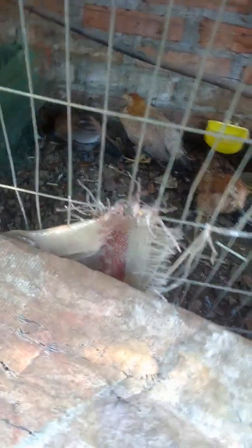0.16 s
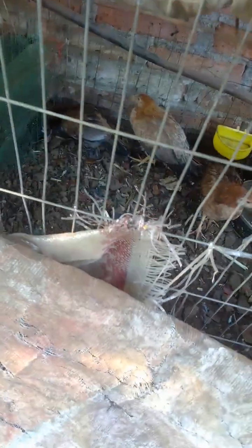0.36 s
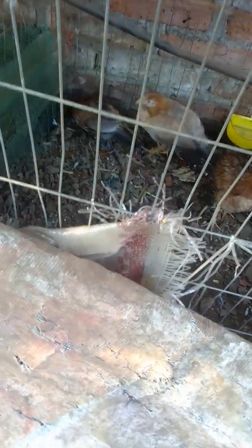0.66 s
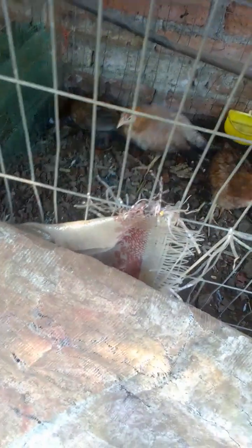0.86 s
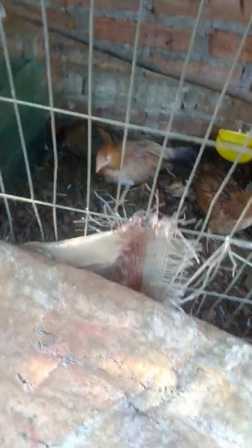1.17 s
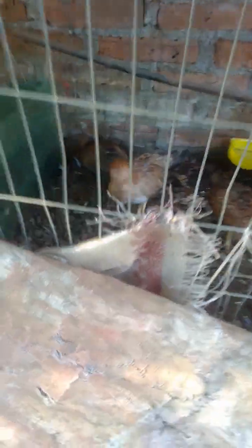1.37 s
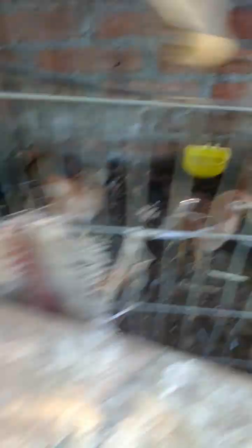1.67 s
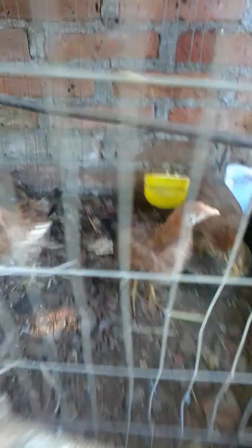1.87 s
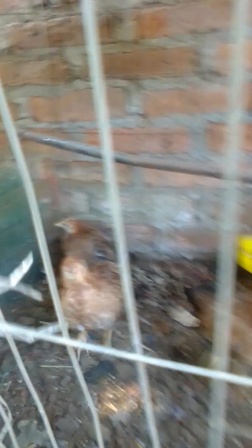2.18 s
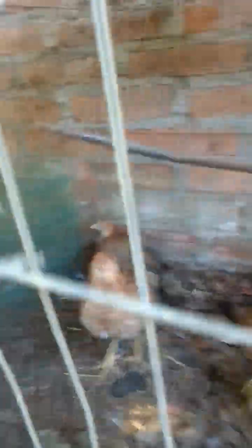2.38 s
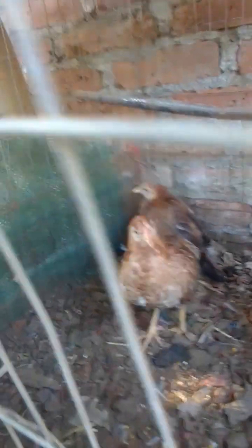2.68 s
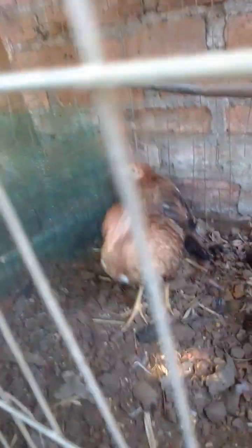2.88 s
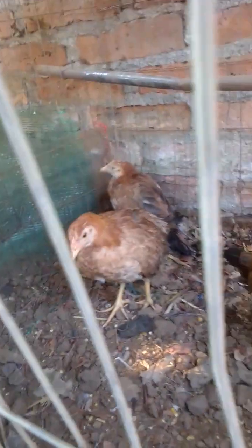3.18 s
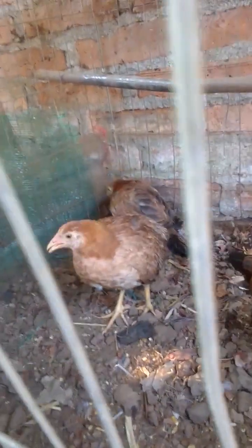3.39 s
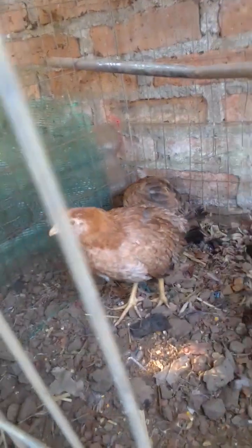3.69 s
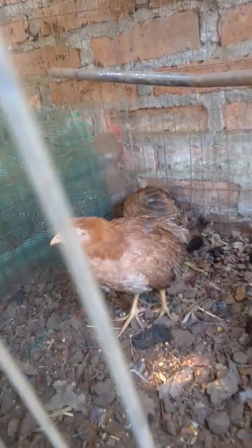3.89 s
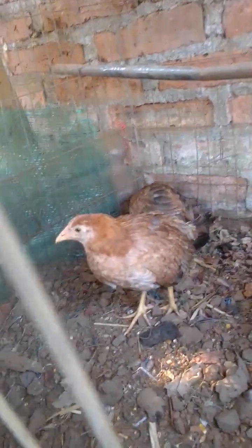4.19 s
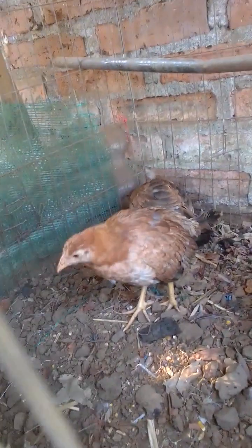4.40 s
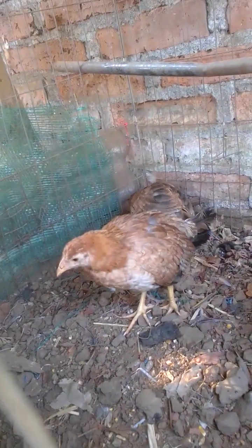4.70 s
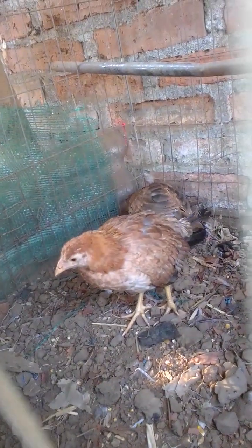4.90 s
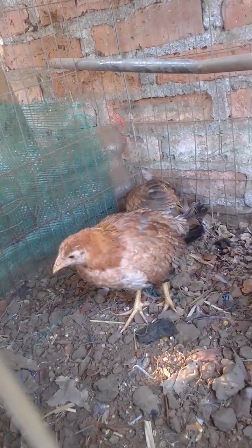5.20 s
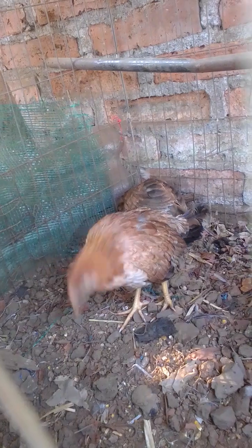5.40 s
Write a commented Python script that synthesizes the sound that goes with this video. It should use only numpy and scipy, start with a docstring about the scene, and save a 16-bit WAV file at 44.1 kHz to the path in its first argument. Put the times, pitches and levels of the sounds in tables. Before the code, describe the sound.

Chickens rake the dirt, beat their wings against wire mesh, then one draws out a hoarse call in a quiet yard.

```python
"""Young hens in a wire pen against a brick wall: wings beat and brush the mesh, feet rake the litter.
Rustle, scrape and thud are clumps of tiny contacts; snaps and knocks are noise puffs through a resonance.
Hens squawk and croon, and one draws out a long hoarse call of wavering partials and narrow noise bands.
Chicks peep in near-sines; wild birds whistle and chirp further off. The wall returns a short echo,
and yard hum and stirring air lie underneath."""
import sys
import numpy as np
from scipy import signal
from scipy.fft import rfft, irfft, next_fast_len
from scipy.io import wavfile

SR = 44100
rng = np.random.default_rng(int(sys.argv[2]) if len(sys.argv) > 2 else 0)


def wrap_up_sound(samples):
    """Save the sound to the file named by the first command line argument, as 16-bit audio."""
    columns = np.atleast_2d(samples).T
    # keep every value between -1 and 1, then stretch to whole-number steps
    tamed = np.clip(columns, -1, 1)
    steps = np.round(tamed * 32767).astype(np.int16)
    wavfile.write(sys.argv[1], SR, steps)


N = 244306

# The flock's steady stirring. Each row: time in seconds, then rustle, wire, thud and dryness in dB.
FIDGET = [(0, -70.5, -71, -72.5, 5), (.12, -62.5, -68.5, -61, -9), (.59, -68.5, -61, -60, -10),
          (.8, -65.5, -65, -50, 3), (.92, -72, -76.5, -66, -3), (1.0, -73, -62, -72.5, 21),
          (1.33, -68.5, -74, -62, -16), (1.5, -68, -82, -75, -5), (1.72, -94, -90, -87, 0),
          (1.78, -69.5, -75, -76, -8), (1.9, -58.5, -72, -54, -31), (2.05, -60, -75, -69.5, -9),
          (2.4, -50.5, -60, -53, -3), (2.57, -46.5, -64, -65, -9), (2.72, -35, -55, -56.5, -2),
          (2.87, -55, -45.5, -51, -6), (2.96, -44, -54.5, -63, -4), (3.13, -71.5, -74.5, -78, -9),
          (3.33, -93.5, -100, -100, 8.5), (3.5, -77.5, -77, -86.5, -4.5), (3.82, -63, -72, -64.5, 23),
          (4.0, -74, -73.5, -68.5, 19), (4.26, -86, -92.5, -84.5, 7), (4.4, -66, -76, -67.5, -1),
          (4.6, -73, -77.5, -80, -1.5), (4.95, -83.5, -81, -73.5, 4.5), (5.45, -86.5, -76, -76.5, -2),
          (5.54, -65.5, -67.5, -63.5, 2)]
# Wing strokes against air and mesh. Each row: end of build-up, build-up length and hold in seconds,
# then rustle, wire, thud and dryness in dB.
WINGBEATS = [(0.942, .012, 0.027, -60, -63, -67, 15), (1.137, .03, 0.021, -60.5, -62, -67, 0),
             (1.255, .05, 0.031, -62.5, -69, -58, 1), (1.416, .015, 0.013, -43.5, -79, -67, -3.5),
             (1.807, .025, 0.06, -45.5, -54.5, -55, -12.5), (2.106, .03, .004, -36.5, -53.5, -62, -7),
             (2.148, .04, 0.0061, -46, -74, -78, 1), (2.287, .075, 0.0066, -21.5, -34.5, -40.5, -15.5),
             (2.326, .02, 0.0044, -26.5, -38.5, -47.5, 1), (2.354, .015, 0.003, -38, -40, -63, 26),
             (2.398, .012, 0.0045, -37.5, -56, -47.5, -4), (2.456, .015, 0.0074, -27.5, -40, -48, 1.5),
             (2.483, .012, 0.011, -30.5, -53.5, -67, -6), (2.587, .01, 0.024, -55, -50, -47.5, -11),
             (2.606, .012, 0.014, -36.5, -55, -45.5, -8.5), (2.635, .014, 0.0043, -18, -38, -49.5, -6),
             (2.666, .04, 0.029, -30, -45.5, -73, -10), (2.77, .008, 0.0063, -28, -39.5, -45.5, 0),
             (2.801, .05, .022, -31, -39, -42, -3.5), (2.894, 0.04, 0.028, -26, -33.5, -46.5, -7),
             (2.972, .012, 0.0087, -46, -59, -59, 2)]
# Feet raking the litter. Each row: peak time in seconds, then thud, wire and hardness in dB.
RAKES = [(.12, -68, -79, -15), (0.249, -49, -56.5, -10), (0.307, -43, -53.5, -9), (0.356, -47, -57, -18),
         (0.402, -41.5, -68, 3), (0.491, -51.5, -63, 17), (0.536, -47.5, -62, -15), (.598, -41, -45, -18),
         (.628, -41, -55, -15), (0.649, -36.5, -43.5, -16), (0.697, -35, -54, -15), (.8, -63, -71, -19),
         (1.22, -44.5, -72, -24), (1.362, -56, -64, -29), (1.436, -50.5, -73, -22.5),
         (1.837, -38.5, -46, -24), (3.919, -56.5, -57, -23), (4.069, -69, -60, -23.5),
         (4.143, -47, -71, -16), (4.401, -53, -50, -24)]


def amp(db):
    return 10 ** (np.asarray(db) / 20)


def rms_one(x):
    return x / np.sqrt(np.mean(x ** 2) + 1e-20)


def in_time(rows):
    """Rows of (seconds, values..) to one per-sample curve per value."""
    s, *columns = np.transpose(rows)
    return [np.interp(np.arange(N) / SR, s, c) for c in columns]


def drift(rate_hz):
    """Low-passed noise, rms 1."""
    r = np.exp(-2 * np.pi * rate_hz / SR)
    return rms_one(signal.lfilter([1], [1, -2 * r, r * r], rng.standard_normal(N + SR))[SR:])


def coloured(x, spectrum):
    """Shapes a flat signal by (Hz, dB) points; rms 1."""
    size = next_fast_len(N)
    hz, db = np.transpose(spectrum)
    bins_hz = np.maximum(np.arange(size // 2 + 1) * SR / size, 1)
    shape_db = np.interp(np.log(bins_hz), np.log(hz), db, left=-90, right=-90)
    return rms_one(irfft(rfft(x, size) * amp(shape_db), size)[:N])


def resonance(x, hz, width_hz):
    """Two-pole band-pass, peak gain 1."""
    r = np.exp(-np.pi * width_hz / SR)
    feedback = [1, -2 * r * np.cos(2 * np.pi * hz / SR), r * r]
    return signal.lfilter([(1 - r * r) / 2, 0, (r * r - 1) / 2], feedback, x)


def butter(x, order, hz, kind):
    return signal.sosfilt(signal.butter(order, hz, kind, fs=SR, output="sos"), x)


def tilted(x, split_hz, tilt_db):
    """Raises the part above the split against the part below."""
    low, high = butter(x, 4, split_hz, "low"), butter(x, 4, split_hz, "high")
    return low * amp(-tilt_db / 2) + high * amp(tilt_db / 2)


def grains(per_s, spread_db, clump_db):
    """Tiny contacts at random moments, uneven in size, in clumps."""
    born = rng.random(N) < per_s / SR
    sizes = amp(spread_db * np.minimum(rng.exponential(1, N), 4)) * rng.choice([-1, 1], N)
    return born * sizes * amp(clump_db * drift(33))


def tone(track, ratio=1, rough_db=0, rough_hz=0, jitter=0, phase_rad=0):
    """One partial along a (seconds, Hz, dB) track; with jitter, pitch and level waver."""
    hz, db = in_time(track)
    t = np.arange(N) / SR
    gate = np.clip(np.minimum(t - track[0][0], track[-1][0] - t) / 0.01, 0, 1)
    if jitter:
        hz = hz * (1 + jitter * drift(rough_hz))
        db = db + rough_db * drift(rough_hz)
    return np.sqrt(2) * gate * amp(db) * np.sin(2 * np.pi * np.cumsum(ratio * hz) / SR + phase_rad)


def noise_band(track, spread_hz, ratio=1):
    """Narrow noise riding on a pitch track."""
    quadrature = [tone(track, ratio, phase_rad=phase) for phase in (0, np.pi / 2)]
    return sum(part * drift(spread_hz) for part in quadrature) / np.sqrt(2)


def held(notes):
    """Notes at one pitch as two-point tracks."""
    return [[(s, hz, start_db), (s + length_s, hz, end_db)]
            for s, length_s, hz, start_db, end_db in notes]


def blows(rows, t60_s, q, rise_cycles):
    """Dying puffs of noise, each through one broad resonance; low ones start softer."""
    size = 4096
    out, t = np.zeros(N + size), np.arange(size) / SR
    for s, db, hz in rows:
        puff = rng.standard_normal(size) * amp(-60 * t / t60_s) * np.minimum(t * hz / rise_cycles, 1)
        ring = resonance(puff, hz, hz / q)
        start = round(s * SR)
        out[start:start + size] += amp(db) * ring / np.abs(ring).max()
    return out[:N]


def strokes(peak_s, build_up_s, hold_s, fall_db_per_s):
    """One gain row per movement, every 32 samples: 30 dB rise over the build-up, hold, fall."""
    t = np.arange(0, N + 32, 32)[:, None] / SR - peak_s
    rise_db = 30 * np.minimum(t, 0) / np.maximum(build_up_s, 1 / SR)
    return amp(rise_db - fall_db_per_s * np.maximum(t - hold_s, 0)).T


def layered(floor_db, floor_tilt_db, *moves):
    """Adds movements (strokes, dB, tilt dB) in power over a floor; returns gain and weighted tilt dB."""
    power = amp(floor_db) ** 2
    tilt = power * floor_tilt_db
    for shapes, db, tilt_db in moves:
        for total, weight in ((power, amp(db) ** 2), (tilt, amp(db) ** 2 * tilt_db)):
            total += np.interp(np.arange(N) / 32, np.arange(shapes.shape[1]), weight @ shapes ** 2)
    return np.sqrt(power), tilt / power


def yard_and_air():
    """Swelling yard hum and the rumble of air stirring at the microphone."""
    # Hum and rumble spectra. Each row: frequency in Hz, relative density in dB.
    hum_spectrum = [(100, -45.5), (170, -16), (312, 1), (484, -2), (631, -10.5), (906, -10), (1330, -12.5),
                    (3180, -13), (3840, -13), (7200, -24), (16000, -26.5)]
    air_spectrum = [(13, -23.5), (22, -1), (27, -7.5), (49, 6.5), (103, 4), (162, -13.5), (180, -10),
                    (230, -35), (400, -120)]
    # Background levels. Each row: time in seconds, air level in dB, hum swell in dB.
    levels = [(0, -88, 3.5), (.37, -76, 22), (.63, -77, 10.5), (.97, -83.5, 1), (1.59, -91, 3),
              (1.85, -76, -2), (2.04, -87, 16), (2.3, -76, 19), (2.68, -88, 6), (3.25, -87.5, 0),
              (3.8, -84, 5), (3.89, -72, 9), (3.98, -83.5, 4), (5.2, -84, 0), (5.54, -89.5, 1)]
    air_db, swell_db = in_time(levels)
    hum = amp(-79 + swell_db) * coloured(rng.standard_normal(N), hum_spectrum)
    return hum + amp(air_db) * coloured(rng.standard_normal(N), air_spectrum)


def echoes(x, t60_s):
    """Short scatter from brick and ground."""
    t = np.arange(SR // 2) / SR
    response = rng.standard_normal(len(t)) * amp(-60 * t / t60_s) * (t > 0.003)
    return signal.fftconvolve(x, response / np.sqrt(np.sum(response ** 2)))[:N]


def whistle(start_s, hz, db, length_s):
    """A wild bird's flat note: quick onset, hold, fade; the pitch sags a little."""
    onset_s, fade_s, sag_hz_per_s = 0.025, 0.12, 250
    shape = [(0, -18), (onset_s, 0), (length_s, 0), (length_s + fade_s, -18)]
    track = [(start_s + t, hz - sag_hz_per_s * t, db + offset_db) for t, offset_db in shape]
    return noise_band(track, spread_hz=25)


def wild_birds():
    """Far whistles and chirps; distance and echoes make them waver and linger."""
    # Whistles. Each row: start in seconds, pitch in Hz, level in dB, seconds until the fade.
    whistles = [(0.098, 4104, -52, 0.067), (0.917, 4140, -55, 0.058), (3.3, 4017, -59, 0.091),
                (4.503, 4144, -60.5, 0.056), (5.276, 4170, -59, 0.053)]
    # A repeated pair of chirps. Each row: offset in seconds, centre in Hz, relative level in dB.
    falling = [(0, 5570, -3), (.055, 4980, -13), (.125, 4600, -2)]
    rising = [(.09, 2690, -3), (0.142, 3305, 0), (.22, 3100, -11)]
    # Repeats of the pair. Each row: start in seconds, level in dB.
    repeats = [(3.29, -69.5), (4.501, -67), (5.261, -73.5)]
    # Single chirps. Each row: start and length in seconds, centre in Hz, start and end level in dB.
    singles = [(.97, 0.18, 3380, -62, -75), (1.0, 0.11, 3730, -59, -74), (5.46, 0.066, 4700, -67.5, -69.5)]
    pairs = [[(s + t, hz, db + offset_db) for t, hz, offset_db in chirp]
             for s, db in repeats for chirp in (falling, rising)]
    song = sum(whistle(*row) for row in whistles)
    song += sum(noise_band(track, spread_hz=290) for track in pairs + held(singles))
    return song + amp(-9) * echoes(song, t60_s=0.17)


def chicks():
    """Falling, wavering near-sines with a short echo."""
    # One track per peep. Each row: time in seconds, pitch in Hz, level in dB.
    tracks = [
        [(.46, 2780, -62), (.481, 2570, -54), (.505, 2175, -41.5), (.52, 2100, -85)],
        [(.81, 2820, -75), (.824, 2730, -64), (.85, 2650, -73)],
        [(.98, 2480, -49), (1.0, 2690, -68), (1.03, 2505, -46), (1.064, 2390, -59), (1.08, 2280, -86)],
        [(2.29, 2407, -42), (2.34, 2400, -34), (2.36, 2173, -47), (2.372, 1710, -36.5), (2.383, 1430, -73)],
    ]
    peeps = sum(tone(track, rough_db=4, rough_hz=120, jitter=0.022) for track in tracks)
    return peeps + amp(-14.5) * echoes(peeps, t60_s=0.2)


def squawks_and_croon():
    """Hoarse squawks of startled hens and one soft, low, wavering note."""
    # Squawks. Each row: start and length in seconds, strongest partial in Hz, start and end level in dB.
    notes = [(0, 0.084, 1592, -68.5, -68), (1.05, .13, 2200, -60, -62.5), (1.39, 0.065, 2040, -68, -59),
             (2.11, 0.16, 1400, -65, -56), (2.47, .11, 1910, -49.5, -62.5), (2.62, 0.21, 1920, -37.5, -66)]
    # Croon. Each row: time in seconds, pitch in Hz, level in dB.
    croon = [(3.02, 488, -70), (3.06, 495, -72), (3.23, 489, -73.5), (3.38, 482, -88.5)]
    squawks = sum(noise_band(track, spread_hz=90) for track in held(notes))
    return squawks + tone(croon, rough_db=3.5, rough_hz=22.7, jitter=0.021)


def long_call():
    """A hen's throat favours the second partial; the fundamental is breathy, the fourth thin and clear."""
    # The call. Each row: time in seconds, second partial in Hz, levels of partials 2, 4 and 1 in dB.
    call = [(4.029, 971, -67, -89.5, -72.5), (4.12, 944.4, -79, -86, -69.5), (4.2, 946, -72, -88, -76.5),
            (4.299, 980, -76.5, -91, -91), (4.442, 970, -66, -87.5, -67.5),
            (4.551, 1005, -64.5, -94.5, -76.5), (4.8, 1045, -53.5, -87, -82.5),
            (4.939, 1070, -61.5, -92.5, -72), (5.1, 1057, -55, -84, -70.5), (5.38, 1036, -55, -71.5, -70.5),
            (5.54, 1025, -58, -82.5, -79.5)]
    strong, above, below = (np.array(call)[:, [0, 1, column]] for column in (2, 3, 4))
    s, hz, db = strong.T
    breath_db = -67.5 + 0.45 * (db - db.mean())   # follows part of the swing in effort
    second = tone(strong, rough_db=2.5, rough_hz=25, jitter=0.003)
    rattle_hz = 38 + 6 * drift(8.1)
    throat_rattle = 1 + np.sin(2 * np.pi * np.cumsum(rattle_hz) / SR)
    breath = throat_rattle * noise_band(np.transpose([s, hz, breath_db]), spread_hz=46)
    fourth = tone(above, ratio=2, rough_db=2, rough_hz=48, jitter=0.00483)
    fundamental = noise_band(below, spread_hz=55, ratio=0.5)
    sixth = amp(-33) * noise_band(strong, spread_hz=52, ratio=3)
    return fundamental + second + breath + fourth + sixth


def snaps_and_knocks():
    """Straw and mesh snap; steps, pecks and bumps knock. The small microphone dulls both ends."""
    # Impacts. Each row: start in seconds, peak in dB before the band-pass, centre in Hz.
    snaps = [(.0551, -40.5, 6300), (.2978, -36.5, 3770), (.362, -36.5, 4120), (.4259, -43, 8300),
             (.4423, -43.5, 4760), (.4935, -39, 7350), (.5312, -48, 3480), (.565, -46, 6690),
             (.629, -39, 7700), (.6494, -34.5, 6760), (.676, -41, 5340), (.737, -29.5, 5830),
             (.751, -36, 6500), (.9682, -47, 4130), (1.1403, -44, 5900), (1.1568, -40.5, 6100),
             (1.4185, -37, 7460), (1.4262, -28, 6100), (1.7943, -33, 6960), (1.8266, -27, 7150),
             (1.8645, -33, 5150), (1.952, -29, 6650), (2.1095, -26, 6940), (2.2179, -47, 6710),
             (2.3224, -14, 6200), (2.355, -18, 6200), (2.399, -25.5, 6900), (2.4593, -30, 4970),
             (2.4818, -35, 8320), (2.586, -39, 5830), (2.611, -35, 6000), (2.6356, -18, 6100),
             (2.7716, -18, 5650), (2.8867, -38, 5780), (2.969, -36, 6900), (3.0002, -22.5, 6960),
             (3.023, -33, 7200), (3.056, -41, 7250), (3.5373, -47.5, 7430), (3.677, -42.5, 8060),
             (3.7216, -30.5, 8200), (3.7589, -36, 7550), (3.78, -26, 8600), (3.7888, -31, 7650),
             (3.8042, -26, 7300), (3.8084, -39, 7600), (3.8462, -37, 6750), (3.8811, -34, 7140),
             (3.9155, -32.5, 7300), (3.9606, -36, 7500), (4.0647, -33.5, 6650), (4.14, -31, 7480),
             (4.3305, -42, 7440), (4.3526, -49, 6330), (4.369, -51, 4570), (4.3828, -40, 7580),
             (4.3948, -31, 4800), (4.4137, -32, 7040), (4.4393, -45, 7200), (4.4683, -42, 4860),
             (4.7354, -45, 7250)]
    knocks = [(.071, -47, 476), (.115, -48, 605), (.244, -48, 305), (.346, -34, 294), (.361, -30.5, 1040),
              (.398, -35.5, 1200), (.441, -40.5, 1620), (.492, -44, 2220), (.524, -41, 690),
              (.579, -45, 460), (.592, -35.5, 970), (.63, -37, 2180), (.676, -43, 2100), (.689, -43, 770),
              (.788, -45, 358), (1.208, -39.5, 600), (1.354, -47.5, 249), (1.435, -49, 630),
              (1.795, -49, 865), (1.824, -45, 840), (1.948, -54, 960), (2.113, -38.5, 1390),
              (2.166, -49, 503), (2.222, -44, 1400), (2.285, -14, 1910), (2.396, -33, 625),
              (2.459, -32.5, 1770), (2.585, -44, 856), (2.776, -21.5, 2100), (2.874, -32, 1840),
              (3.065, -48.5, 481), (3.604, -50, 1120), (3.737, -47, 423), (3.821, -43, 1220),
              (3.845, -44, 490), (3.886, -39.5, 453), (3.914, -41.5, 453), (3.958, -49, 547),
              (4.027, -48.5, 642), (4.064, -50, 422), (4.099, -51.5, 500), (4.142, -35, 1720),
              (4.372, -49, 1026), (4.394, -34, 1880), (4.467, -43, 880), (4.604, -52, 1022),
              (4.685, -53.5, 1037)]
    hits = blows(snaps, t60_s=0.0063, q=5.9, rise_cycles=1.2)
    hits += blows(knocks, t60_s=0.011, q=3, rise_cycles=0.61)
    return butter(hits, 2, [195, 8800], "band")


def litter_thud(hardness_db):
    """Dull contacts with the litter; hardness tips them towards the upper band."""
    # Litter spectrum. Each row: frequency in Hz, relative density in dB.
    spectrum = [(88, -48), (150, -34), (296, -7.5), (502, -3), (843, 9.5), (1180, 3), (1290, 0),
                (1700, 0.5), (2210, -49.5), (3740, -120)]
    contacts = coloured(grains(per_s=1800, spread_db=0.97, clump_db=3.2), spectrum)
    return tilted(contacts, split_hz=450, tilt_db=hardness_db)


def wire_scrape():
    """Rubbing contacts ring the mesh; rms 1."""
    # Mesh resonances. Each row: frequency in Hz, width in Hz, relative gain in dB.
    modes = [(1370, 89, 7), (1840, 170, 8.5), (2260, 580, 5.5), (2920, 340, 4), (3450, 480, 1.5),
             (5010, 50, 5.5), (6530, 87, 3)]
    rubbing = grains(per_s=2500, spread_db=3, clump_db=2.5)
    return rms_one(sum((-1) ** k * amp(db) * resonance(rubbing, hz, width_hz)
                       for k, (hz, width_hz, db) in enumerate(modes)))


def feather_rustle(dryness_db):
    """Bright brushing with dry ticks; treble bands swell and sink as different straws and vanes brush."""
    # Rustle spectrum. Each row: frequency in Hz, relative density in dB.
    spectrum = [(1530, -51), (2600, -20), (3240, -11.5), (4040, 1.5), (5150, 0.5), (6000, 6), (7710, 8),
                (9470, 0), (10500, -5.5), (16000, -43.5)]
    brushing = coloured(grains(per_s=8000, spread_db=3.5, clump_db=2.5), spectrum)
    patches = sum((amp(4.5 * drift(22)) - 1) * resonance(brushing, hz, hz / 8)
                  for hz in np.geomspace(3300, 9500, 10))
    rustle = tilted(rms_one(brushing + patches), split_hz=5500, tilt_db=dryness_db)
    ticks = butter(grains(per_s=350, spread_db=2.7, clump_db=6.2), 4, [4430, 9000], "band")
    return rustle + amp(-18.5) * rms_one(ticks)


def flock():
    """Fidgeting and wingbeats drive litter, mesh and feathers; raking feet drive litter and mesh."""
    rustle_db, wire_db, thud_db, dry_db = in_time(FIDGET)
    *wing_timing_s, wing_rustle_db, wing_wire_db, wing_thud_db, wing_dry_db = np.transpose(WINGBEATS)
    rake_s, rake_thud_db, rake_wire_db, rake_hard_db = np.transpose(RAKES)
    wings = strokes(*wing_timing_s, fall_db_per_s=523.5)
    rakes = strokes(rake_s, build_up_s=0.024, hold_s=0, fall_db_per_s=790)
    hard_db = -16 + 0.18 * (rustle_db - rustle_db.mean())   # harder the more the flock stirs
    thud_gain, hardness_db = layered(thud_db, hard_db, (wings, wing_thud_db, 0.5),
                                     (rakes, rake_thud_db, rake_hard_db))
    wire_gain, _ = layered(wire_db, 0, (wings, wing_wire_db, 0), (rakes, rake_wire_db, 0))
    rustle_gain, dryness_db = layered(rustle_db, dry_db, (wings, wing_rustle_db, wing_dry_db))
    return (thud_gain * litter_thud(hardness_db) + wire_gain * wire_scrape()
            + rustle_gain * feather_rustle(dryness_db))


def scene():
    birds = flock() + snaps_and_knocks() + long_call() + squawks_and_croon() + chicks() + wild_birds()
    wall = amp(-29) * echoes(birds, t60_s=0.1)
    return (birds + wall + yard_and_air())[None]


def record(dry):
    """Steep low-pass, 60 dB down from 16.2 kHz."""
    return signal.sosfilt(signal.cheby2(14, 60, 16200, fs=SR, output="sos"), dry)


dry = scene()
out = record(dry)
wrap_up_sound(out)
```